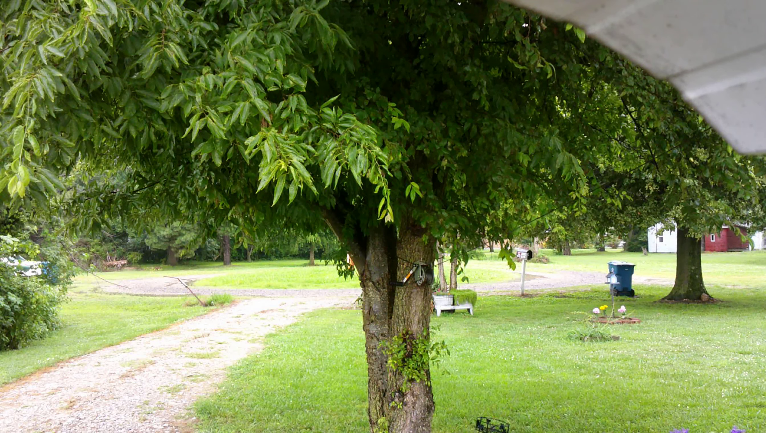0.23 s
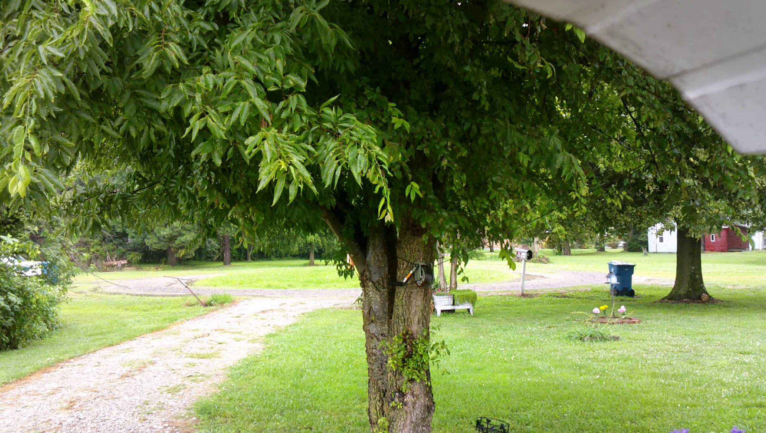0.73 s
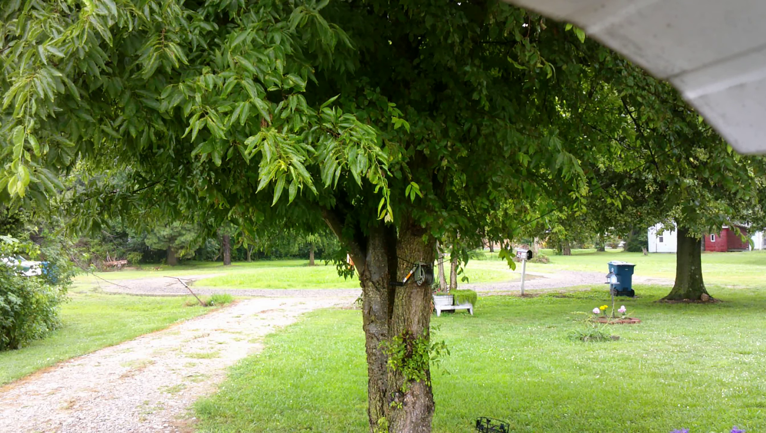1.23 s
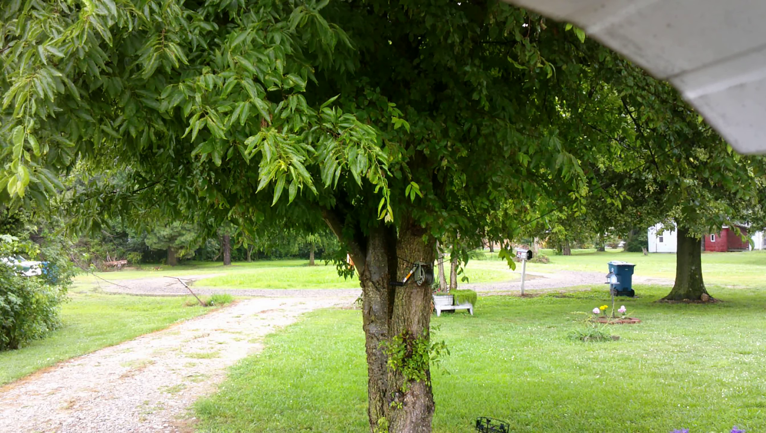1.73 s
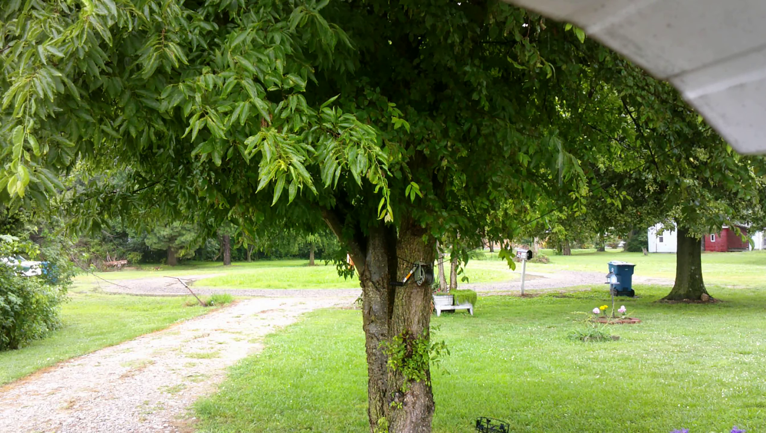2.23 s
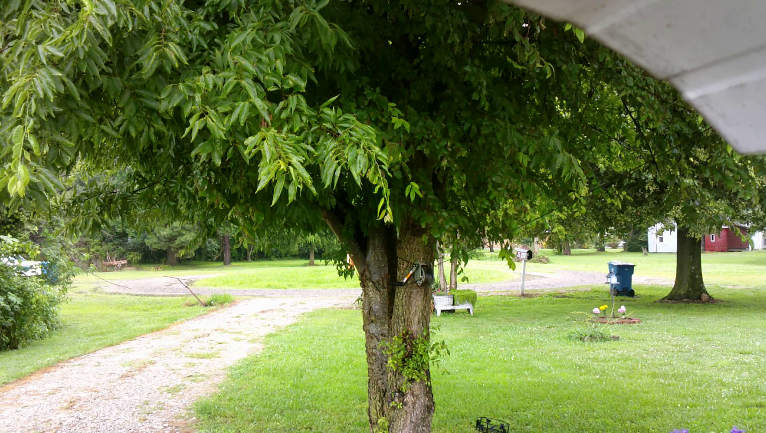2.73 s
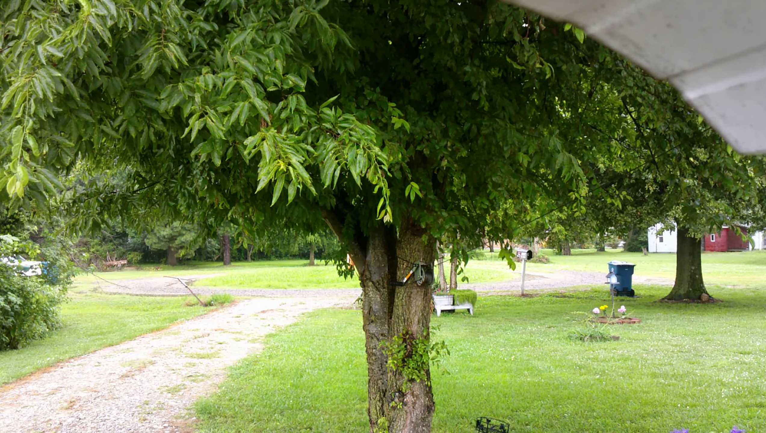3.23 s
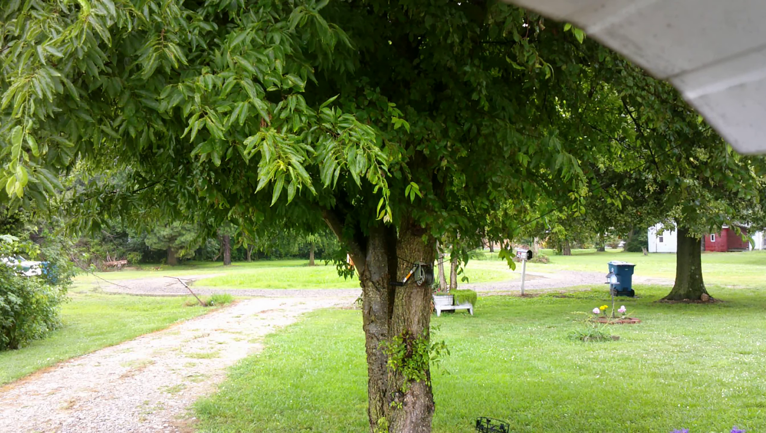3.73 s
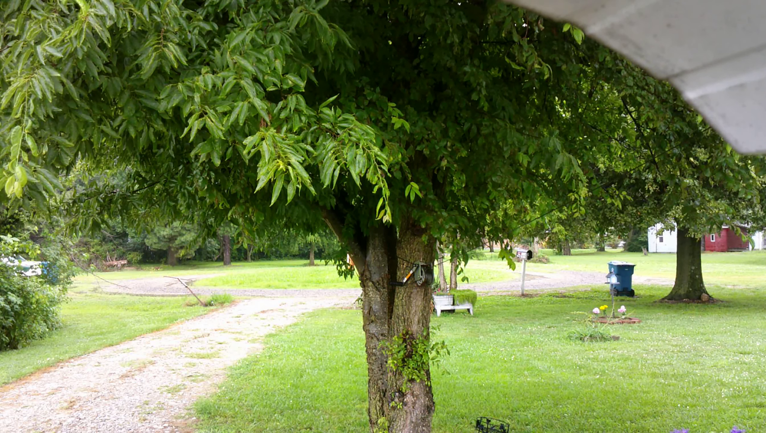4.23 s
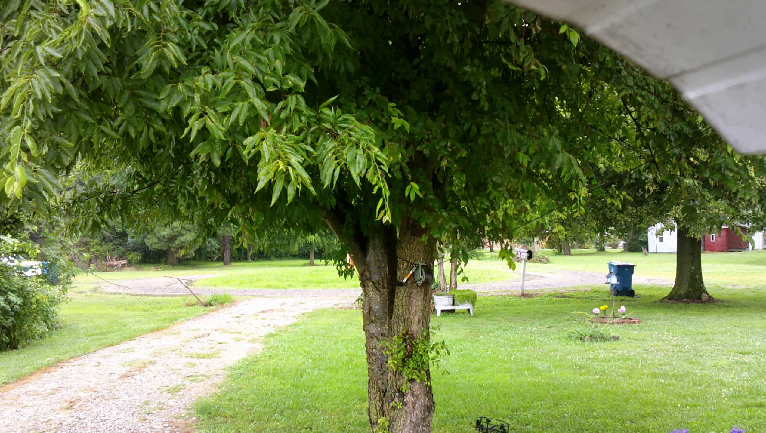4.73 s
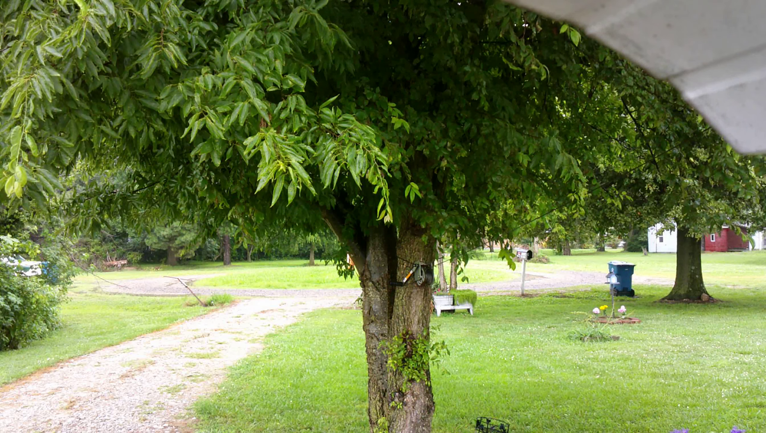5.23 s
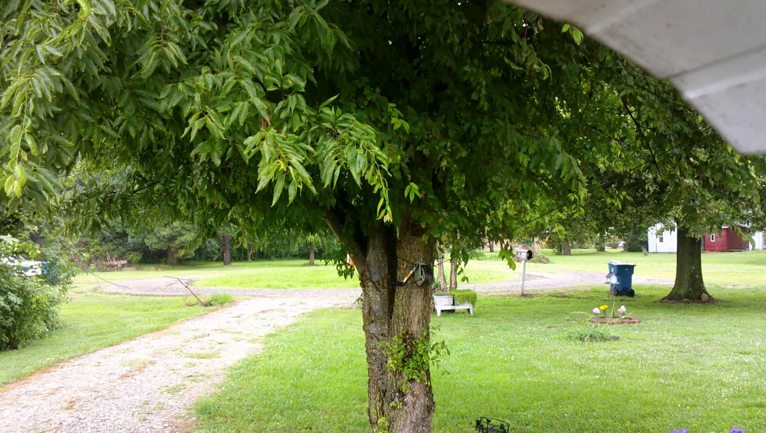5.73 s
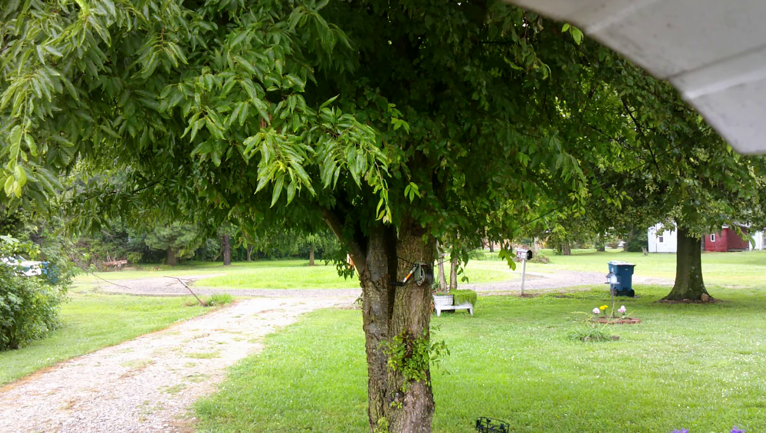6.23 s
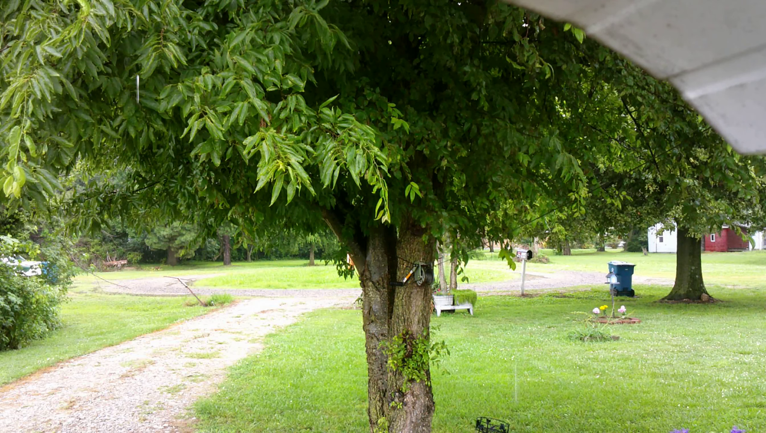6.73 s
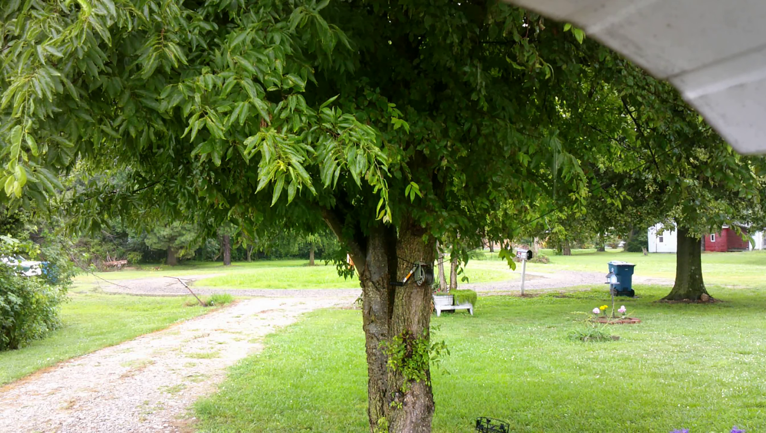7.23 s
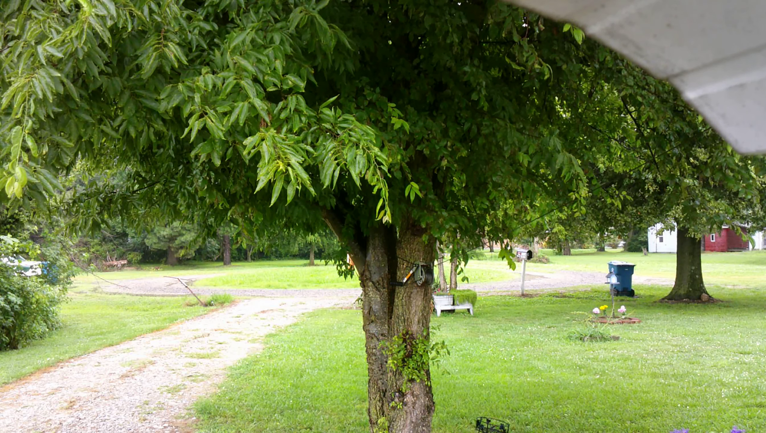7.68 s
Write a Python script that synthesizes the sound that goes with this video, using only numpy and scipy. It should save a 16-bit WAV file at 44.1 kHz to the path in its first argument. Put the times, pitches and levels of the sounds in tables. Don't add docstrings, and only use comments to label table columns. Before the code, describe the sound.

Under a sheet-metal porch roof, steady rain makes a dense, grainy patter from start to finish. Heavy drips from branches smack the metal early on, then a loud splashing cluster lands midway, another sharp hit follows, and a last one comes near the end. Low panels ring briefly after them. Small ticks dot the gaps, and the rain grows heavier late. A small, slightly dull microphone sits close beneath.

```python
import sys
import numpy as np
from scipy import signal
from scipy.fft import rfft, irfft
from scipy.io import wavfile
from scipy.ndimage import uniform_filter1d

SR = 44100
rng = np.random.default_rng(int(sys.argv[2]) if len(sys.argv) > 2 else 0)


def invert_db(level):
    return 10 ** (np.asarray(level, dtype=float) / 20)


def inscribe(sig):
    pcm = np.round(np.clip(np.atleast_2d(sig).T, -1, 1) * 32767)
    wavfile.write(sys.argv[1], SR, pcm.astype(np.int16))


N = 350595
TAIL = int(0.9 * SR)

# frequency in Hz, gain in dB.
ROOF = [(60, -34.5), (100, -17.5), (170, -10), (235, -4), (330, -8), (500, -4.5), (900, -2.5), (1220, 0.5),
        (1400, -1.5), (1650, -3), (2300, -2.5), (3420, -6.5), (3750, -11), (20000, -12)]
# frequency in Hz, gain in dB.
MIC = [(20, -5), (4000, 1.5), (5050, -5.5), (5650, -2), (6700, -1.5), (7300, -8), (8000, -16.5),
       (8600, -26), (8950, -34.5), (9150, -43.5), (9300, -49), (20000, -91)]


def set_level(x, db):
    return x * invert_db(db) / np.sqrt(np.mean(x ** 2))


def shaped(x, response):
    hz, db = np.transpose(response)
    f = np.fft.rfftfreq(len(x), 1 / SR) + 1
    return irfft(rfft(x) * invert_db(np.interp(np.log(f), np.log(hz), db)), len(x))


def part(x, name):
    band_edges = {"thud": (100, 800), "body": (800, 3600), "tick": (3600, 12000), "spray": (7600, 22000)}
    lo, hi = band_edges[name]
    f = np.fft.rfftfreq(len(x), 1 / SR) + 1
    below_hi = 1 / (1 + (f / hi) ** 8)
    below_lo = 1 / (1 + (f / lo) ** 8)
    return irfft(rfft(x) * (below_hi - below_lo), len(x))


def walk(rate):
    hold = int(SR / rate)
    steps = np.repeat(rng.standard_normal(N // hold + 1), hold)
    return 1.03 * uniform_filter1d(uniform_filter1d(steps, hold), hold)[:N]


def add(out, s, sound):
    i = int(s * SR)
    out[i:i + len(sound)] += sound[:len(out) - i]


def patter():
    # time in seconds, shower strength in dB.
    strength = [
        (0.0, -37),
        (0.46, -36.5),
        (0.64, -37),
        (3.34, -37),
        (3.72, -36),
        (5.62, -37),
        (6.73, -34),
        (7.39, -33.5),
        (7.95, -33.5),
    ]
    shares = {"body": (-37.5, 0.92), "tick": (-47, 1.11), "thud": (-44.5, 0.73)}
    calm_db = -37
    spots = [sheet(splash_s=0.00177, ring_db=-8, panel_db=-32) for _ in range(15)]
    shared = invert_db(-1.0) * shower(spots[:6])
    flicker = invert_db(2.6 * walk(200) + 2.2 * walk(40))
    rise_db = np.interp(np.arange(N) / SR, *np.transpose(strength)) - calm_db
    out = 0
    for k, (name, (share_db, slope)) in enumerate(shares.items()):
        own_spots = spots[6 + 3 * k:9 + 3 * k]
        drops = evened(shared + shower(own_spots))
        drops = drops + part(drops, "spray") * (flicker - 1)
        heard = shaped(shaped(drops, ROOF), MIC)
        share = steadied(part(heard, name))
        out = out + set_level(share, share_db + slope * rise_db)
    return out


def shower(spots):
    drops_per_s, size_spread_db, biggest_db = 3000, 3.5, 11
    out = 0
    for spot in spots:
        falls = rng.random(N + TAIL) < drops_per_s / len(spots) / SR
        size_db = size_spread_db * rng.exponential(size=N + TAIL)
        sizes = np.zeros(N + TAIL)
        sizes[falls] = invert_db(np.minimum(size_db[falls], biggest_db))
        out = out + signal.fftconvolve(sizes, spot, "valid")[:N] * invert_db(0.99 * walk(9))
    return out


def sheet(splash_s, ring_db, panel_db, fade_s=0.0041):
    # frequency in Hz, level in dB, t60 in seconds.
    low_modes = [(230, -1.5, 0.25), (322, -10.5, 0.58), (466, -11, 0.51), (550, 1, 0.66), (608, -3, 1),
                 (733.4, 8, .6), (1010, -24, 0.71), (1119, 3.5, 0.89), (1225, 1, 0.82), (1344, -17.5, 0.23),
                 (1760, -13, 0.5), (1900, -25.5, 0.8), (2347, 6, 0.22)]
    # frequency in Hz, t60 in seconds.
    ring_time = [(150, 0.44), (500, 0.9), (1500, 0.51), (3000, 0.472), (6000, 0.45), (9000, 0.28)]
    t = np.arange(TAIL) / SR
    splash_decay = np.exp(-np.maximum(t - splash_s, 0) / fade_s)
    contact = 1.1 * np.exp(-t / 0.0022)
    splash = rng.standard_normal(TAIL) * (splash_decay + contact)

    ring = np.zeros(TAIL)
    ring_hz, ring_t60 = np.transpose(ring_time)
    for hz in 140 * 2 ** np.arange(0, 6.5):
        t60 = np.interp(np.log(hz), np.log(ring_hz), ring_t60)
        band = signal.butter(2, [hz / np.sqrt(2), hz * np.sqrt(2)], "band", fs=SR, output="sos")
        ring += signal.sosfilt(band, rng.standard_normal(TAIL)) * invert_db(-60 * t / t60)

    chances = rng.standard_normal((len(low_modes), 2))
    for (hz, db, t60), (size, detune) in zip(low_modes, chances):
        decay = invert_db(db + panel_db + 3.2 * size - 60 * t / t60)
        ring += decay * np.sin(2 * np.pi * hz * (1 + 0.0035 * detune) * t)
    return splash + invert_db(ring_db) * ring


def evened(x, width_hz=120):
    spectrum = rfft(x)
    power = uniform_filter1d(abs(spectrum) ** 2, int(width_hz * len(x) / SR))
    return irfft(spectrum / np.sqrt(power), len(x))


def steadied(x, span_s=0.35):
    return x / np.sqrt(uniform_filter1d(x ** 2, int(span_s * SR)))


def drips():
    # start in seconds, body level in dB, tick and thud shares in dB, splash in seconds.
    heavy_drips = [
        (0.262, -33, -6, -6.5, 0.0088),
        (0.2712, -33, -7.5, -7.5, 0.0108),
        (0.947, -37, -6.5, -13, .012),
        (3.7013, -29.5, -10.5, -20, 0.024),
        (3.748, -30, -6, -6.5, 0.025),
        (3.867, -41, -13, 1, .004),
        (5.051, -32, -2.5, -8, 0.0055),
        (5.059, -34.5, -6, -8, .005),
        (7.372, -33, -4.5, -11.5, .006),
        (3.794, -36.5, -14, -14, .025),
    ]
    lead = 630
    head = slice(lead, lead + int(0.012 * SR))
    out = np.zeros(N)
    for s, body_db, tick_db, thud_db, splash_s in heavy_drips:
        ring_db = -2.5 + 0.13 * (thud_db + 10.5) - 0.44 * (tick_db + 6.5) + 200 * (splash_s - 0.01)
        blow = np.r_[np.zeros(lead), sheet(splash_s, ring_db, panel_db=-30)]
        blow = blow + part(blow, "spray") * (invert_db(1.25 * (tick_db + 11.0)) - 1)
        blow = shaped(shaped(blow, ROOF), MIC)
        smack = np.zeros(len(blow))
        for name, share_db in (("tick", tick_db), ("body", 0), ("thud", thud_db)):
            share = part(blow, name)
            smack += share * invert_db(body_db + share_db) / np.std(share[head])
        add(out, s - lead / SR, smack)
    return out


def note(hz, db, t60):
    t = np.arange(TAIL) / SR
    build_up = 1 - np.exp(-t / 0.0029)
    return invert_db(db - 60 * t / t60) * build_up * np.sin(2 * np.pi * hz * t)


def panels():
    # frequency in Hz, level in dB, t60 in seconds.
    wide_panel = [(236.6, -0.95, 0.21), (338, -11, 1.36), (568, -4, 0.71), (1624, -6, 0.56)]
    rib_panel = [(729, -8, .36), (1110, -1, 0.16)]
    far_panel = [(456, -8, 1.0), (603, -10.5, .7), (1000, -7.5, .5), (1263, 1.02, 0.24), (2840, -4, 0.19)]
    # start in seconds, then blow to the wide, rib and far panel in dB.
    strikes = [
        (.263, -31, -30, -55),
        (3.702, -55, -26.5, -37),
        (3.749, -30, -52, -27.5),
        (5.052, -53, -42, -50),
    ]
    # start in seconds, frequency in Hz, level in dB, t60 in seconds.
    pings = [(.39, 520, -40, 0.354), (3.703, 2600, -33, 0.17), (3.85, 245, -40, .4),
             (4.083, 3190, -31, 0.17), (2.884, 3550, -36, .1), (5.06, 328, -42.5, 1.0),
             (5.052, 2400, -26, .1), (5.07, 360, -41, 0.64), (5.053, 5555, -32.5, 0.13),
             (5.061, 6550, -34, 0.1), (7.371, 2300, -29, .11)]
    out = np.zeros(N)
    for s, *blows_db in strikes:
        for panel, blow_db in zip((wide_panel, rib_panel, far_panel), blows_db):
            add(out, s, invert_db(blow_db) * sum(note(*mode) for mode in panel))
    for s, *mode in pings:
        add(out, s, note(*mode))
    return out


def ticks():
    # start in seconds, centre frequency in Hz, level in dB.
    small_drops = [(0.047, 5600, -43), (0.57, 4600, -50), (1.355, 6340, -46), (1.401, 8340, -47),
                   (1.929, 6100, -46.5), (1.94, 8060, -48), (1.986, 4650, -38), (2.616, 3750, -49),
                   (2.632, 6630, -46), (2.884, 3560, -42.5), (3.34, 5370, -42), (3.445, 5540, -44),
                   (3.935, 5900, -46), (4.25, 5140, -46), (4.505, 7730, -41), (5.233, 4490, -46),
                   (5.63, 3560, -42), (6.741, 4820, -42), (6.894, 6600, -44), (7.208, 7940, -48),
                   (7.314, 3630, -40), (7.41, 5050, -41), (7.812, 8100, -49)]
    spit_s, half_width_hz = 0.0065, 650
    t = np.arange(int(0.08 * SR)) / SR
    out = np.zeros(N)
    for s, hz, db in small_drops:
        band = signal.butter(2, [hz - half_width_hz, hz + half_width_hz], "band", fs=SR, output="sos")
        burst = rng.standard_normal(len(t)) * np.exp(-np.maximum(t - spit_s, 0) / 0.011)
        spit = signal.sosfilt(band, burst)
        add(out, s, spit * invert_db(db) / np.std(spit[t < spit_s]))
    return shaped(out, MIC)


def yard():
    # frequency in Hz, gain in dB.
    wash_colour = [(8.8, -37), (15, -13), (59, -12.5), (118, -7.5), (144, -10), (178, -0.5), (200, -4.5),
                   (260, -31), (440, -120)]
    wash = shaped(rng.standard_normal(N), [*wash_colour, (400, -59.5)])
    return set_level(wash * invert_db(1.0 * walk(4.4)), -58.5)


def scene():
    return (patter() + drips() + panels() + ticks() + yard())[None]


def low_pass(x):
    return signal.sosfilt(signal.butter(12, 9260, fs=SR, output="sos"), x)


def record(dry):
    skirt = signal.butter(14, 9000, fs=SR, output="sos")
    narrow = signal.sosfiltfilt(skirt, dry)
    return low_pass(narrow)


dry = scene()
out = record(dry)
inscribe(out)
```